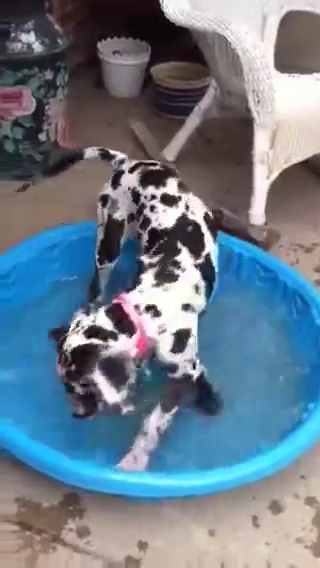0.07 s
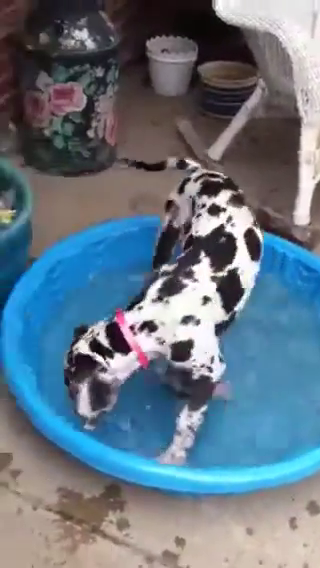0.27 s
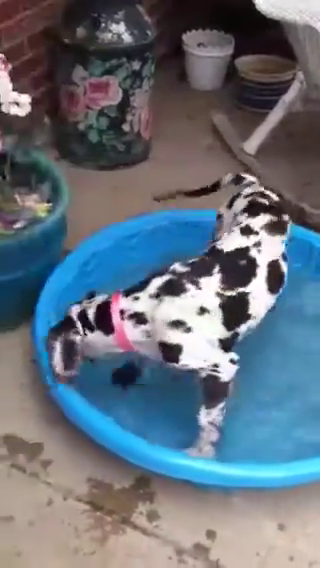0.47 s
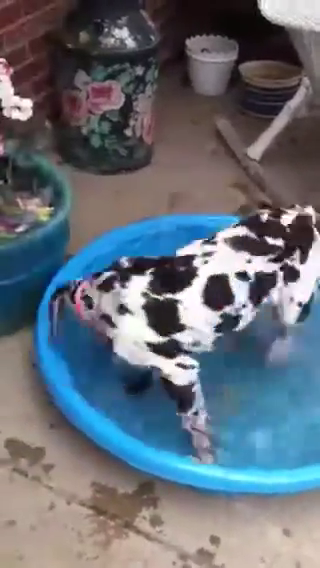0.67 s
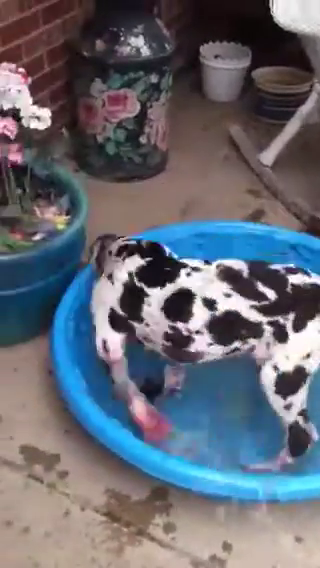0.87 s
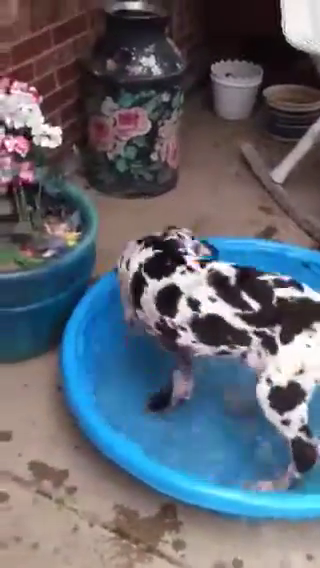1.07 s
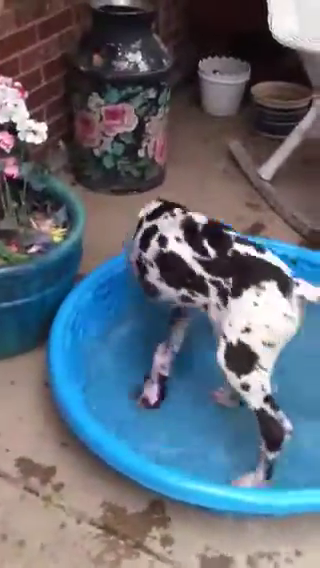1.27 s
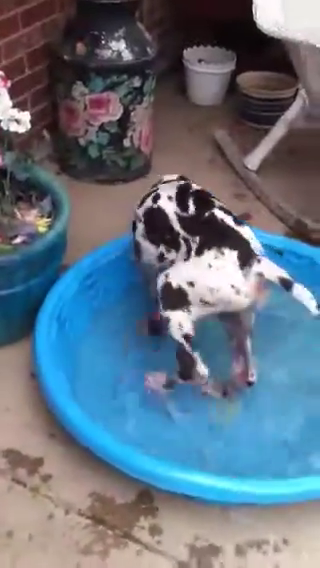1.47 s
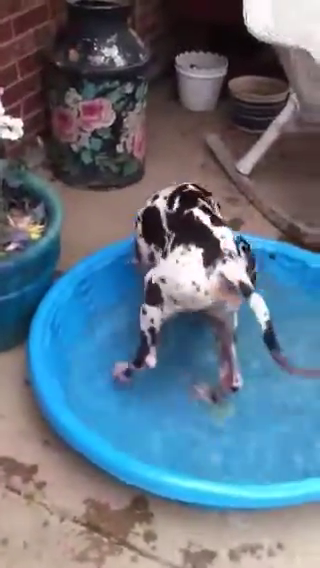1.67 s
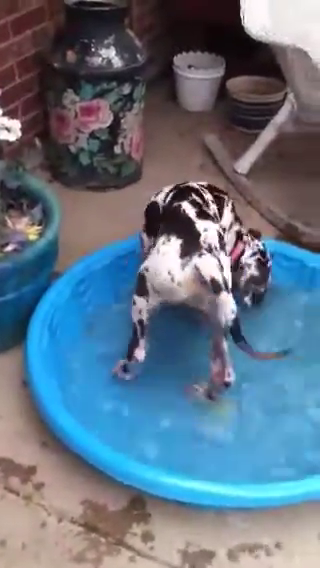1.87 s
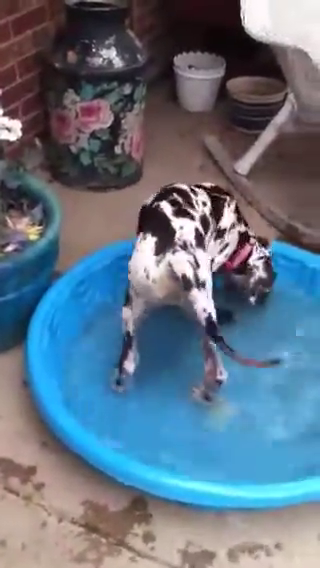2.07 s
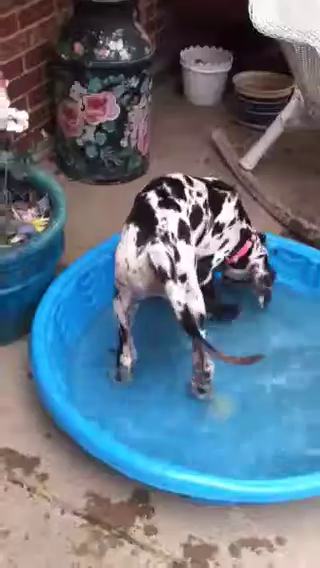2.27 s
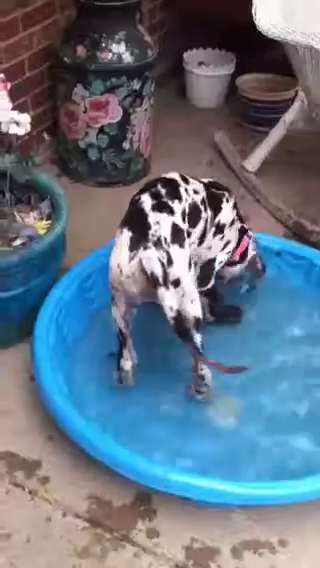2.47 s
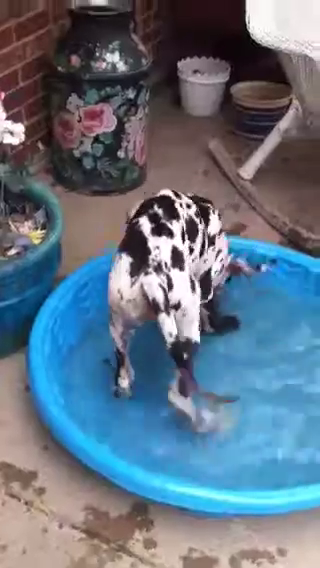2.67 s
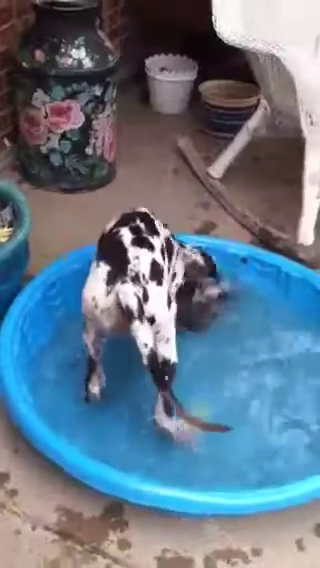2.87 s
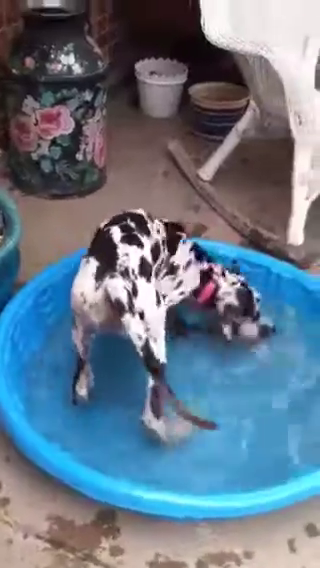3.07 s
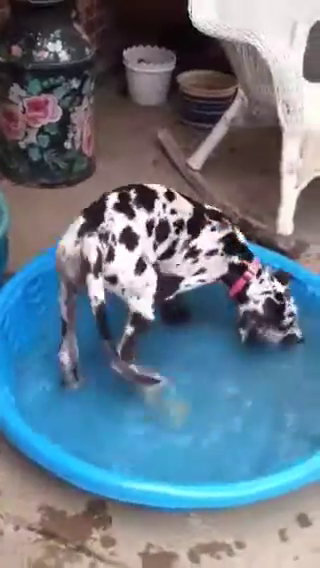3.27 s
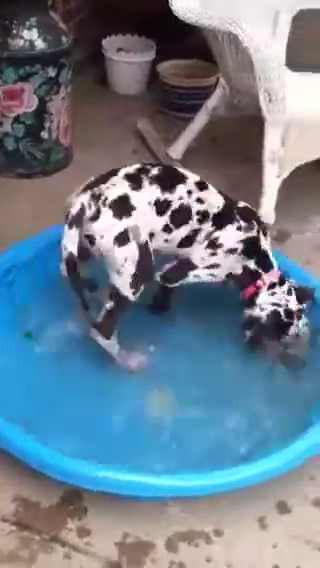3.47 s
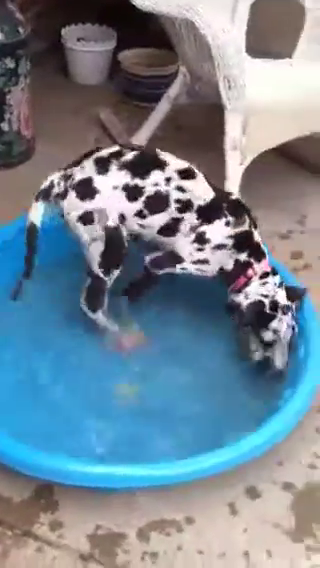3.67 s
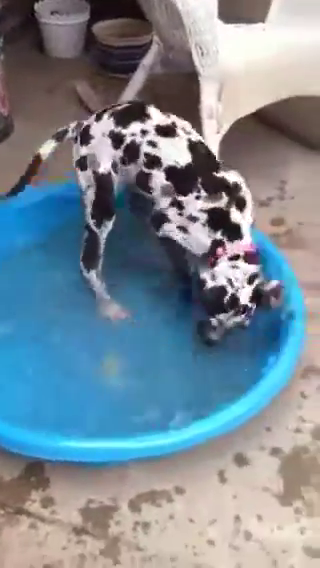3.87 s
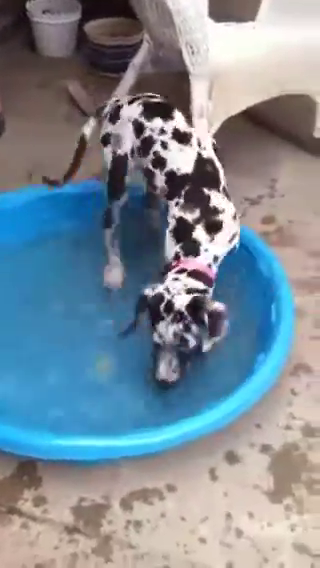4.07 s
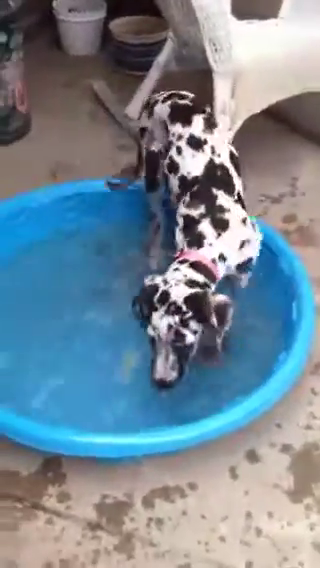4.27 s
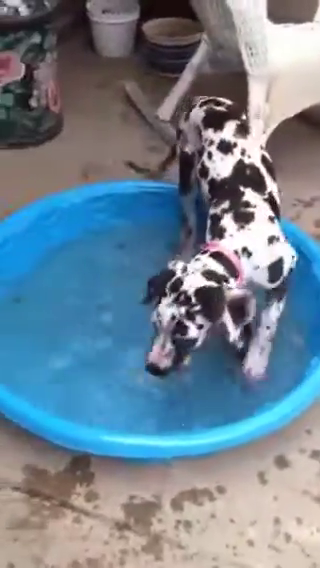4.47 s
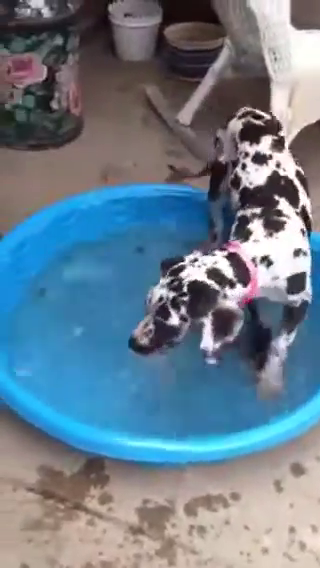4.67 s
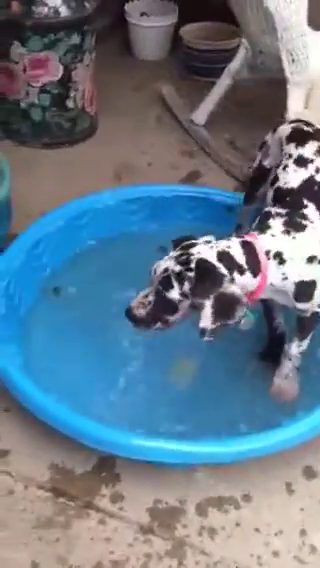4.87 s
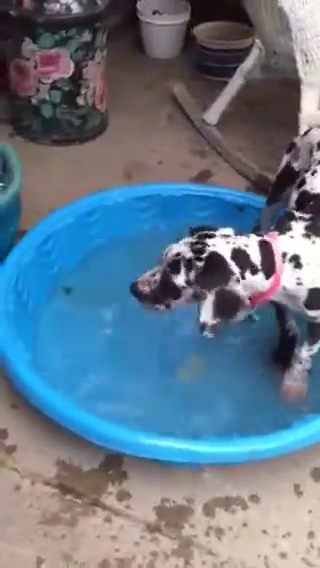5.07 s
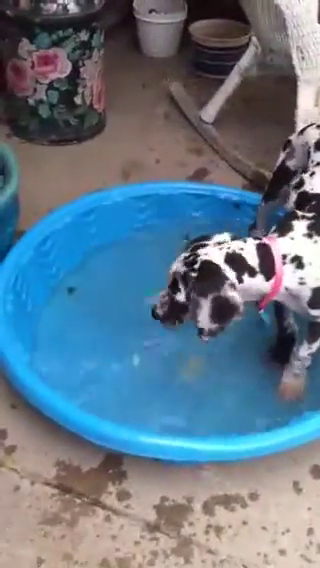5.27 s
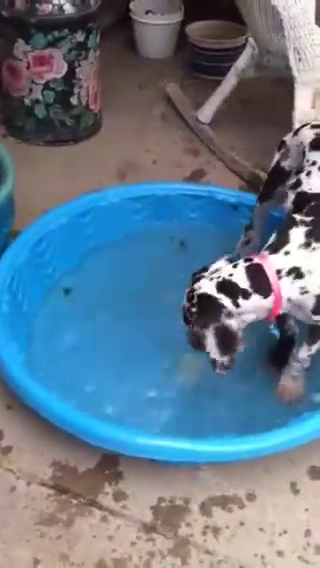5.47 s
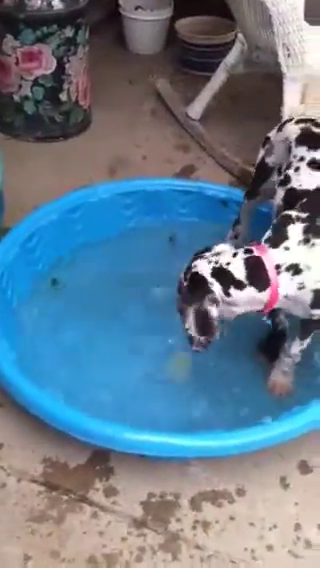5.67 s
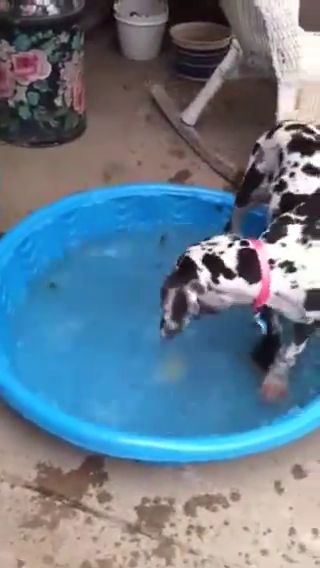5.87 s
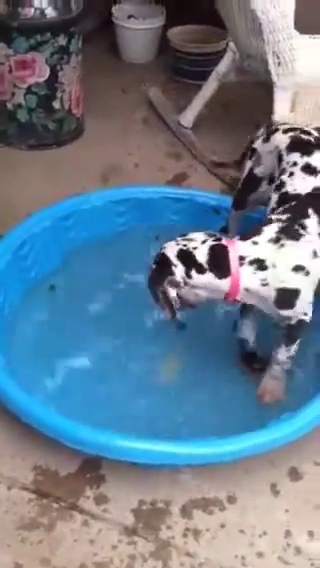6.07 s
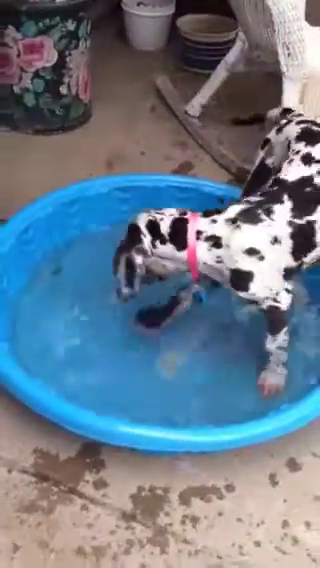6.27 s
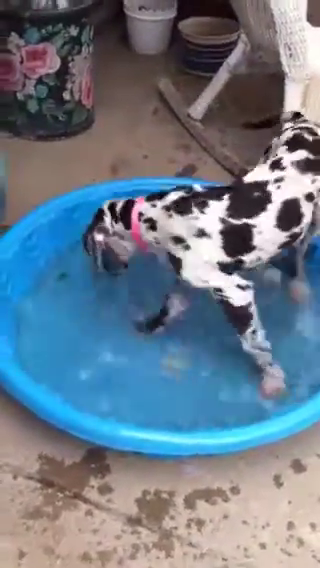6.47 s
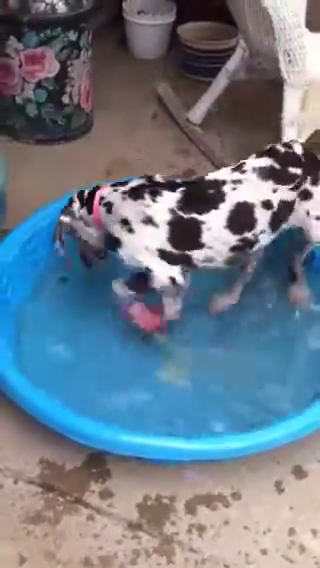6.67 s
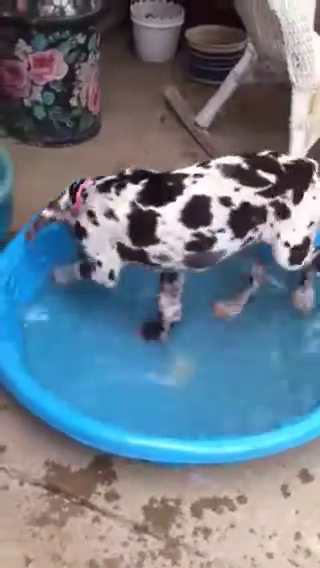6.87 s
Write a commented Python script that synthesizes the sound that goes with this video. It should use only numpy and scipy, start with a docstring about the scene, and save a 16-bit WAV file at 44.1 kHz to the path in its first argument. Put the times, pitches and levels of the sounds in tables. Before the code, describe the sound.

Close, natural outdoor water sounds: paws plunge and skim through shallow water, making low gulps, ringing mid-pitched bubbles, bright droplets and wet slaps. Uneven early splashing leads to lighter plopping, then a dense churning burst halfway through. The water calms almost completely before a brief last flurry with a loud crisp smack. Short patio echoes surround it over a very faint hum.

```python
"""A puppy wades, paws and noses about in a shallow plastic pool on a patio, for about seven seconds.
It opens with quick splashes over stirred water: plunging and spraying noise, bubbles that ring, slaps that crack.
The strokes are heaviest from about 3.4 to 4.3 s, then the water calms to laps and stray trickling bubbles.
Near 6.5 s a last flurry brings the sharpest slap. Throughout, decaying noise and echoes answer from pool and
house wall, and shaped steady noise makes a faint outdoor hum."""
import sys
import numpy as np
from scipy import signal
from scipy.fft import rfft, irfft, next_fast_len
from scipy.io import wavfile
from scipy.ndimage import uniform_filter1d

SR = 44100
rng = np.random.default_rng(int(sys.argv[2]) if len(sys.argv) > 2 else 0)


def waveform_to_disk(signal):
    """Save audio, clipped to [-1, 1], as 16-bit WAV at the path in sys.argv[1]."""
    frames = np.transpose(np.atleast_2d(signal))
    scaled = np.clip(frames, -1, 1) * 32767
    samples = np.round(scaled).astype(np.int16)
    wavfile.write(sys.argv[1], SR, samples)


N = 305613  # length in samples

# Stirred water between strokes, before the settling gains.
# Each row: time in seconds, then bass, middle, treble and top level in dB.
STIRRED_WATER = [(0.0, -54.5, -55, -46.5, -47), (0.33, -59, -57, -72, -77), (0.44, -67, -58, -60.5, -62),
                 (0.52, -59, -52.5, -62, -63), (0.87, -61, -54, -46, -52), (1.08, -51, -54.5, -52.5, -53.5),
                 (1.29, -50, -54, -58.5, -61.5), (1.51, -62, -54, -56, -59.5),
                 (1.77, -54, -50.5, -57, -56.5), (1.91, -55.5, -50.5, -55.5, -56),
                 (2.08, -59, -61.5, -64, -65.5), (2.33, -59, -55.5, -66, -66),
                 (2.52, -64.5, -57.5, -66, -67), (2.659, -55.5, -53, -61, -61.5),
                 (2.82, -58.5, -48.5, -58, -63), (3.36, -61, -47, -53.5, -53.5),
                 (3.53, -56, -43, -52, -52.5), (4.01, -52, -47, -48.5, -52), (4.25, -51.5, -52, -55, -51.5),
                 (4.48, -61.5, -53.5, -52, -56), (4.9, -63, -58, -57, -61), (5.19, -64.5, -62, -67, -65),
                 (6.14, -66.5, -62.5, -68, -68), (6.44, -66, -60, -65, -60), (6.58, -64.5, -64, -58, -64),
                 (6.93, -64.5, -60.5, -63, -60)]
# Paw and muzzle strokes. Each row: start in seconds, swell in seconds, strength in dB before it is shared out,
# depth in dB (plus plunges, minus skims), extra mist in dB, fall by 60 dB in seconds.
STROKES = [(.008, 0.0036, -51.5, 14, 8, 0.36), (0.054, 0.024, -38.5, 0.5, 1.5, 0.13),
           (0.183, 0.0024, -53.5, -0.5, 1.5, 0.71), (0.313, 0.0092, -46.5, 1, -8, 0.28),
           (.47, 0.028, -60, -13, -3, .41), (.555, 0.053, -53, 8.5, 4, 0.24),
           (0.668, 0.012, -43, -3.5, 0.5, 0.17), (0.858, 0.033, -42.5, 11.5, 11, 0.33),
           (.998, 0.0075, -44.5, -4, -3, 0.18), (1.135, 0.0082, -56.5, -9, 0.5, 0.36),
           (1.235, 0.0065, -47, -4, 3, 0.15), (1.273, 0.0053, -42, 1, -6, .16),
           (1.387, 0.0054, -39, -0.5, -1.5, 0.18), (1.612, .004, -61, -16, 1, .088),
           (1.679, 0.0049, -56.5, -14.5, -3.5, 0.27), (1.782, .019, -51, -8, 4, 0.067),
           (1.868, 0.0028, -44.5, 9.5, -2, 0.099), (1.921, 0.0066, -45.5, 10, -4, 0.067),
           (2.048, 0.0047, -49.5, 2, 7.5, 0.1), (2.404, 0.014, -52.5, 8.5, -2, 0.15),
           (2.599, 0.0073, -48, 11, -8, 0.14), (2.694, 0.0033, -47.5, 3, -11, 0.15),
           (2.835, 0.0073, -50, 12, 3, 0.17), (2.89, 0.012, -44.5, 3, 2.5, 0.3),
           (3.014, 0.0046, -44.5, 4.5, -18, 0.067), (3.105, 0.0082, -42.5, 3.5, 3, 0.076),
           (3.134, 0.022, -45, 4, -13, .1), (3.254, 0.0049, -44, -0.5, -5, 0.087),
           (3.389, 0.03, -43, 6, -15, 0.23), (3.432, 0.016, -39, -1, 4.5, 0.23),
           (3.462, 0.021, -31.5, 1.5, -5.5, .14), (3.48, 0.0095, -36, 10.5, -3, 0.32),
           (3.525, 0.01, -36.5, -1.5, -17, 0.052), (3.75, 0.01, -56.5, 17.5, 0, 0.43),
           (3.832, 0.01, -42.5, -1, -1.5, 0.34), (3.997, 0.02, -39, -3, -1, 0.2),
           (4.066, 0.011, -55.5, -17.5, -3, 0.31), (4.204, 0.015, -38, -0.5, 3.5, 0.094),
           (4.328, 0.0072, -46.5, 1.5, -2, 0.16), (4.388, 0.0057, -43.5, 3.5, -1, 0.08),
           (4.7, 0.0046, -66, 16.5, 0, 0.27), (4.865, 0.028, -48, 6, -3, 0.3),
           (5.1, 0.018, -53.5, 7.5, 7.5, 0.085), (5.471, 0.0051, -64.5, -10, -3, 0.18),
           (5.555, 0.034, -62.5, 2, 3, 0.87), (6.223, 0.003, -55, 6.5, 0, 0.17),
           (6.388, 0.0075, -48.5, -4, 0, 0.24), (6.439, 0.012, -50, 4.5, -17, 0.33),
           (6.526, 0.005, -48.5, -10.5, 2, 0.2), (6.542, 0.0028, -53.5, 4.5, -2, 0.37),
           (6.667, 0.029, -54.5, -2.5, -6, 0.7), (6.794, 0.0035, -54.5, -2.5, 6, 0.057)]
# Single bubbles, drips and a close echo.
# Each row: start in seconds, pitch in Hz, peak in dB, time to the peak in seconds.
SINGLE_BUBBLES = [(.009, 276, -38, 0.0043), (0.087, 318, -31, 0.0035), (0.0867, 1500, -36.5, 0.0033),
                  (0.261, 1180, -46.5, 0.005), (.349, 374, -43.5, 0.0051), (0.8869, 242, -37, 0.0044),
                  (0.898, 1580, -34, 0.0016), (1.276, 2010, -30.5, 0.001), (1.2764, 489, -32.5, 0.0074),
                  (1.2766, 764, -27.5, 0.00095), (1.2793, 1355, -36, 0.0053), (1.37, 480, -37, 0.0025),
                  (1.437, 360, -39, 0.0027), (1.5147, 1990, -40, .0024), (1.6104, 782, -32, 0.0041),
                  (1.6148, 2500, -35.5, 0.0017), (1.7198, 2360, -39.5, 0.0036), (1.926, 700, -40, 0.00098),
                  (2.0392, 1300, -34.5, 0.0015), (2.088, 934, -31.5, 0.0013), (2.2872, 920, -34, 0.002),
                  (2.358, 1050, -43, 0.0047), (2.4036, 272, -37.5, 0.0083), (2.4166, 693, -38, 0.0065),
                  (2.428, 1040, -33.5, 0.0014), (2.5741, 1030, -33, 0.00051), (2.6013, 800, -34, 0.0045),
                  (2.739, 2120, -37, 0.00062), (2.7606, 860, -36.5, .0022), (2.7884, 1270, -32, 0.0025),
                  (2.843, 533, -30.5, 0.002), (2.9058, 1060, -33.5, 0.00092), (2.9214, 1280, -37, .0022),
                  (2.943, 334, -39.5, 0.0034), (2.956, 725, -39, 0.0037), (2.978, 600, -34, 0.0014),
                  (3.1117, 303, -31.5, 0.0054), (3.154, 1005, -34, 0.0043), (3.264, 1164, -35.5, 0.0021),
                  (3.3367, 746, -27, 0.0047), (3.3676, 720, -28.5, 0.0016), (3.41, 775, -31, 0.0052),
                  (3.4628, 1300, -32, 0.0022), (3.504, 371, -29.5, 0.0059), (3.5084, 804, -26, 0.0042),
                  (3.5333, 1390, -25, 0.0014), (3.603, 880, -25.5, 0.0022), (3.6677, 773, -28.5, 0.0035),
                  (3.7131, 1100, -33.5, 0.0022), (3.846, 1250, -31.5, 0.0014), (3.8666, 1180, -27, 0.0034),
                  (3.9862, 880, -28.5, 0.0017), (3.988, 534, -36, 0.0022), (4.013, 1220, -28.5, 0.0017),
                  (4.0218, 380, -36.5, 0.0074), (4.1108, 1240, -33.5, 0.0024), (4.189, 930, -37, 0.0026),
                  (4.2081, 760, -25, 0.0012), (4.228, 718, -33.5, 0.0053), (4.24, 1140, -29, 0.001),
                  (4.3466, 1060, -35, 0.0013), (4.752, 2190, -48, 0.0051), (4.8256, 1950, -46, 0.0029),
                  (4.882, 1130, -33, 0.002), (4.9043, 2090, -33.5, 0.0019), (4.9665, 1490, -37.5, 0.0023),
                  (5.0425, 2190, -47, 0.0052), (5.0848, 1940, -49, 0.0029), (6.1073, 1550, -48, 0.0011),
                  (6.2306, 6700, -44.5, 0.0005), (6.2825, 5170, -51, .0008), (6.533, 1540, -28, 0.00035),
                  (6.6054, 1140, -30, 0.0047), (6.623, 1155, -38.5, 0.0034), (6.67, 1510, -42, 0.0024),
                  (6.6757, 2050, -43, 0.002), (6.7014, 1156, -40.5, 0.003), (6.8502, 837, -46, 0.0085)]
# Sharp slaps and drops on the surface.
# Each row: start in seconds, pitch in Hz, level in dB before a 1 dB trim, ring length in cycles (peak halfway).
SURFACE_SLAPS = [(0.068, 3270, -30, 1.4), (.188, 3150, -32, 3.5), (0.3224, 2790, -30.5, 3.6),
                 (0.325, 1570, -34.5, 2.4), (0.336, 3800, -45, 7.6), (0.479, 4830, -39, 3),
                 (.862, 2600, -34, 2.7), (1.075, 2430, -38, 3), (1.371, 5060, -34, 3),
                 (1.534, 3930, -39, 2), (1.87, 3300, -35, 0.87), (2.709, 1900, -44, 2),
                 (2.985, 2150, -37, 3), (3.151, 2190, -32, 2.7), (3.2558, 4470, -41, 3.8),
                 (3.542, 2980, -30, 2.2), (3.653, 2370, -36.5, 3.4), (3.717, 2040, -27, 0.73),
                 (3.788, 2370, -38, 3.7), (3.846, 2060, -36, 1), (4.0031, 2080, -27.5, 3.8),
                 (4.005, 5100, -27.5, 4.2), (4.053, 3600, -34, 1.9), (4.2193, 2270, -35, 1.2),
                 (4.392, 1930, -35.5, 3), (4.482, 2250, -40, 1.8), (4.506, 2800, -29.5, 0.72),
                 (4.589, 2320, -32, 2.5), (4.649, 1200, -39, 1.6), (4.722, 2620, -37.5, 4.7),
                 (4.967, 3840, -35, 1), (5.028, 2450, -36.5, 1), (5.742, 2000, -45.5, 1.5),
                 (5.763, 2600, -46.5, 1.9), (6.083, 4210, -52.5, 3.2), (6.172, 1550, -50, 3.4),
                 (6.228, 1640, -47, 4.6), (6.266, 3070, -48.5, 3.2), (6.3506, 2940, -54, 4),
                 (6.3743, 2720, -50, 3.7), (6.3964, 3290, -30, 4.2), (6.5294, 2260, -34, 1.4),
                 (6.5438, 2840, -15.5, 2.4), (6.796, 1790, -33.5, 2.5), (6.888, 3200, -46, 3.3)]
# Colour of big air pockets plunging. Each row: frequency in Hz, relative level in dB per Hz.
PLUNGE_COLOUR = [(60, -41), (100, -42), (150, -6.5), (215, 1.5), (290, -1), (380, -0.5), (520, -3.5),
                 (700, -10), (1400, -62)]
# Colour of middling bubbles gurgling. Each row: frequency in Hz, relative level in dB per Hz.
GURGLE_COLOUR = [(250, -3), (450, -5.5), (750, 5.5), (1250, 4.5), (1800, -3), (2400, -4.5), (3600, -18),
                 (7000, -59)]
# Colour of spray, mist and droplets. Each row: frequency in Hz, relative level in dB per Hz.
SPRAY_COLOUR = [(1000, -12), (1800, 0.5), (2500, -2), (3500, -1.5), (5300, -6), (8000, -9.5), (12000, -13),
                (16000, -16.5)]
# Colour of the outdoor hum. Each row: frequency in Hz, relative level in dB per Hz.
OUTDOOR_COLOUR = [(25, -13), (55, -19), (85, -3.5), (150, 0), (260, -1.5), (400, -8.5), (550, -5),
                  (900, -4.5), (1300, -16), (2000, -18.5), (5000, -19.5), (9000, -29), (15800, -24)]
# Ring of the patio. Each row: frequency in Hz, fall by 60 dB in seconds.
PATIO_RING = [(200, 0.32), (2000, 0.2), (12000, 0.13)]
# Echoes from the pool side and the house wall. Each row: delay in seconds before stretching, level in dB.
WALL_ECHOES = [(.006, -24.5), (0.013, -15.5), (.021, -19.5)]
# How plunge, gurgle, spray and mist follow the stirred water.
# Each row: gain in dB, water level in dB (before gain) under which the part falls still.
SETTLING_PARTS = [(0.5, -65.5), (-3.5, -58), (-3, -66), (-2.5, -68.5)]
# How a stroke is shared between plunge, gurgle, spray and mist.
# Each row: share in dB, dB gained per dB of depth.
STROKE_SHARES = [(-5, 1), (-1.5, 0), (-3.5, -1), (-4, -1)]
# Tone of the microphone. Each row: frequency in Hz, gain in dB.
MICROPHONE = [(25, -4.0), (55, -10.5), (85, -4.5), (130, -0.5)]

TOP_HZ = 15900  # nothing is kept from here up
MIST_HZ = 5340  # spray above this is mist
SPIT_T60_S = 0.005  # a droplet landing
TRICKLE_CEILING_DB, TRICKLE_LIFT_DB = -40.5, 8  # limit on the stirring that drives stray bubbles, then their gain
TICK_DB, TICK_T60_S = -10.5, 0.0035  # first contact of a slap, level relative to the slap
CRACK_Q, CRACK_DB, CRACK_T60_S = 0.88, -9, 0.021  # sharpness around the pitch, relative level, decay
SCATTER_DB, SCATTER_DELAY_S, SCATTER_T60_S = -18, 0.0022, 0.034  # off the pool side and the puppy's legs
CLIMB_PER_S = 51  # a longer-lived bubble rises further: pitch climb as a share, per s of life
# Lesser bubbles after a single one: time they spread over, level under it, range of pitch, life.
BREAKUP_S, BREAKUP_DB, BREAKUP_OCTAVES, BREAKUP_CYCLES = 0.03, -13, 1.3, 1.8


def water():
    """Big air pockets thud, middling ones gurgle, spray fizzes, droplets patter and the finest mist hisses."""
    deep, middle, fine, finest = agitation()
    plunge = swarm(PLUNGE_COLOUR, low_hz=188.7, high_hz=548.0, rate=260, cycles=1.32, climb=0.4,
                   spread_db=1.5, churn_db=-1.5, rough_db=2.0)
    gurgle = swarm(GURGLE_COLOUR, low_hz=524.0, high_hz=3160, rate=540, cycles=2.6, climb=0.26,
                   spread_db=5.5, churn_db=-12.5, rough_db=-0.5)
    spray = swarm(SPRAY_COLOUR, low_hz=1923, high_hz=6630, rate=620, cycles=6.9, climb=0.13,
                  spread_db=13.0, churn_db=1.0, rough_db=2.5)
    # spray and mist split the treble at one crossover
    spray = filtered(spray, lambda hz: 1 / np.sqrt(1 + (hz / MIST_HZ) ** 8))
    mist = coloured(rng.standard_normal(N), SPRAY_COLOUR) + amp(-4.5) * patter(rate=110, spread_db=17)
    mist = filtered(mist, lambda hz: np.sqrt(1 - 1 / (1 + (hz / MIST_HZ) ** 8)))
    ceiling = amp(TRICKLE_CEILING_DB)
    stirring = ceiling * np.tanh(np.sqrt(middle * fine) / ceiling)
    trickle = strays(stirring, rate=120, centre_hz=2207, octaves=1.55, cycles=3.53, spread_db=9.5)
    body = deep * plunge + middle * gurgle + fine * spray + finest * mist
    return body + amp(TRICKLE_LIFT_DB) * trickle


def agitation():
    """Strength of plunge, gurgle, spray and mist: the stirred pool plus strokes that swell and die."""
    now, t = np.arange(N) / SR, np.arange(SR // 2) / SR
    times, *levels = np.transpose(STIRRED_WATER)
    power = np.zeros((len(levels), N))
    for part, level, (gain_db, still_db) in zip(power, levels, SETTLING_PARTS):
        stir_db = np.interp(now, times, level)
        stillness = 1 + amp(still_db - stir_db) ** 4
        part += amp(stir_db + gain_db) ** 2 / stillness
    # gurgle and spray each come in uneven bursts as wavelets break
    for part in power[1:3]:
        part *= wavelets(rate=45, t60=0.14, share=0.44)
    for s, swell, db, depth_db, mist_db, t60 in STROKES:
        stroke = np.minimum(t / swell, 1) * amp(-60 * np.maximum(t - swell, 0) / t60)
        for part, (share_db, lean), extra_db in zip(power, STROKE_SHARES, (0, 0, 0, mist_db)):
            part_db = db + share_db + lean * depth_db + extra_db
            add(part, s, (amp(part_db) * stroke) ** 2)
    return np.sqrt(power)


def wavelets(rate, t60, share):
    """Power of mean 1, a share of it in bursts that start at once and die quickly."""
    slot, size = rng.random((int(rate * N / SR), 2)).T
    # one burst at a random place in each equal slot of time
    when = (np.arange(len(slot)) + slot) * N / len(slot)
    starts = np.bincount(when.astype(int), size ** 2, N)
    decay = amp(-60 * np.arange(SR // 8) / SR / t60) ** 2
    bursts = np.abs(signal.fftconvolve(starts, decay)[:N])
    return 1 + np.clip(share, 0, 1) * (bursts / bursts.mean() - 1)


def swarm(spectrum, low_hz, high_hz, rate, cycles, climb, spread_db, churn_db, rough_db):
    """A steady crowd of small bubbles on churning noise, at rms 1."""
    when, tone, size, damping, depth = rng.random((int(rate * N / SR), 5)).T[..., None]
    hz = low_hz * (high_hz / low_hz) ** tone
    life = cycles * 2 ** (1 - 2 * damping) / hz
    steps = np.arange(int(2.5 * SR * np.max(life)))
    # most bubbles are faint, a few stand out
    loudness = amp(spread_db * size ** 3) * np.sqrt(hz / life)
    rings = loudness * bubble(steps / SR, hz, life, climb * depth)
    places = (when * N).astype(int) + steps
    crowd = np.bincount(places.ravel(), rings.ravel())[:N]
    # the breaking surface rushes in tiny uneven spurts
    unevenness = unit(uniform_filter1d(rng.standard_normal(N), size=200))
    churn = coloured(amp(rough_db * unevenness) * rng.standard_normal(N), spectrum)
    return unit(coloured(crowd, spectrum) + amp(churn_db) * churn)


def patter(rate, spread_db):
    """Flung droplets land as tiny bright spits, at rms 1."""
    when, size = rng.random((int(rate * N / SR), 2)).T
    landings = np.bincount((when * N).astype(int), amp(spread_db * size ** 2), N)
    decay = amp(-60 * np.arange(SR // 50) / SR / SPIT_T60_S)
    spits = signal.fftconvolve(landings, decay)[:N]
    return coloured(spits * rng.standard_normal(N), SPRAY_COLOUR)


def strays(strength, rate, centre_hz, octaves, cycles, spread_db):
    """Stray bubbles of random size ring at random, following how hard the water is stirred at that moment."""
    out, t = np.zeros(N), np.arange(SR // 12) / SR
    for when, size, damping, *tone in rng.random((int(rate * N / SR), 5)):
        hz = centre_hz * 2 ** (octaves * (sum(tone) - 1))  # two draws crowd the pitches at the centre
        life = cycles * 2 ** (1 - 2 * damping) / hz
        peak = strength[int(when * N)] * amp(-spread_db * size)
        add(out, when * N / SR, peak * bubble(t, hz, life, CLIMB_PER_S * life))
    return out


def plops():
    """Bubbles and drips that stand out, each followed by brief lesser ones as the cavity breaks up."""
    out, t = np.zeros(N), np.arange(SR // 12) / SR
    for s, hz, db, life in SINGLE_BUBBLES:
        add(out, s, amp(db) * bubble(t, hz, life, CLIMB_PER_S * life))
        for lag, tone in rng.random(size=(4, 2)):
            small_hz = hz * 2 ** (BREAKUP_OCTAVES * (tone - 1 / 4))  # mostly higher than the first
            small_life = BREAKUP_CYCLES / small_hz
            small = bubble(t, small_hz, small_life, CLIMB_PER_S * small_life)
            add(out, s + BREAKUP_S * lag, amp(db + BREAKUP_DB) * (1 - lag / 2) * small)
    return out


def slaps():
    """Water struck flat by a paw or a drop: a bright tick, a short ring and a wet crack around its pitch."""
    out, t = np.zeros(N), np.arange(SR // 25) / SR
    for s, hz, db, cycles in SURFACE_SLAPS:
        ring = bubble(t, hz, life=cycles / hz / 2, climb=0.03)
        around = signal.iirpeak(hz, CRACK_Q, SR)
        hiss = signal.lfilter(*around, rng.standard_normal(len(t)))
        hiss = unit(signal.lfilter(*around, hiss))  # a second pass narrows the band
        rise = np.minimum(t * hz / 2, 1)  # over two cycles
        crack = rise * amp(CRACK_DB - 60 * t / CRACK_T60_S) * hiss
        tick = amp(TICK_DB - 60 * t / TICK_T60_S) * rng.standard_normal(len(t))
        add(out, s, amp(db - 1.0) * (tick + ring + crack))
    return out


def bubble(t, hz, life, climb):
    """Trapped air swells to peak 1 at t = life and dies; its pitch climbs as it nears the surface."""
    age = t / life
    shape = age * np.exp((1 - age * np.sqrt(age)) * 2 / 3)
    pitch = hz * (1 + climb * (np.tanh(age / 3) - 0.4))  # starts below hz, ends above
    return shape * np.sin(2 * np.pi * np.cumsum(pitch, axis=-1) / SR)


def patio(x, tail_db, roam):
    """As the puppy moves about, the echo paths change length every fifth of a second."""
    out, step = np.zeros(N), SR // 5
    for start in range(0, N, step):
        response = answer(tail_db, stretch=1 + roam * rng.uniform(-1, 1))
        add(out, start / SR, signal.fftconvolve(x[start:start + step], response))
    return out


def answer(tail_db, stretch):
    """The response from one spot: quick scatter inside the pool, a few clear echoes and a short diffuse tail."""
    hz, t, z = signal.stft(rng.standard_normal(SR // 3), SR, nperseg=256)
    decay = amp(-60 * t / along(PATIO_RING, hz)[:, None])  # each frequency dies at its own pace
    tail = signal.istft(z * decay, SR, nperseg=256)[1]
    response = np.pad(amp(tail_db) * tail / np.linalg.norm(tail), (SR // 200, 0))
    fade = amp(-60 * np.arange(SR // 20) / SR / SCATTER_T60_S)
    scatter = rng.standard_normal(SR // 20) * fade
    add(response, SCATTER_DELAY_S, amp(SCATTER_DB) * scatter / np.linalg.norm(scatter))
    for delay, db in WALL_ECHOES:
        add(response, delay * stretch, amp(db) * np.array([0.25, 0.5, 0.25]))  # slightly dulled
    return response


def outdoor_hum():
    """Steady noise, strongest in the low range, stands for the faint outdoors."""
    return amp(-63.0) * coloured(rng.standard_normal(N), OUTDOOR_COLOUR)


def amp(db):
    """Decibels to gain."""
    return 10 ** (np.asarray(db) / 20)


def unit(x):
    """Scale to rms 1."""
    return x / np.sqrt(np.mean(x ** 2) + 1e-20)


def along(points, hz):
    """(Hz, value) points read on a log frequency axis."""
    f, v = np.transpose(points)
    return np.interp(np.log(hz + 1), np.log(f + 1), v)


def filtered(x, response):
    """Multiply the spectrum of x by a response of frequency."""
    size = next_fast_len(N + SR // 2)
    return irfft(rfft(x, size) * response(np.fft.rfftfreq(size, 1 / SR)), size)[:N]


def coloured(x, spectrum):
    """Filter x by a colour table, at rms 1."""
    return unit(filtered(x, lambda hz: amp(along(spectrum, hz))))


def add(track, s, sound):
    """Mix a sound into the track at time s."""
    part = track[max(round(s * SR), 0):][:len(sound)]
    part += sound[:len(part)]


def scene():
    """The pool, its surroundings and the outdoor hum."""
    pool = water() + plops() + slaps()
    return (pool + patio(pool, tail_db=-9.0, roam=0.2) + outdoor_hum())[None]


def record(dry):
    """The microphone thins out the deep bass and keeps nothing above its band limit."""
    return filtered(dry[0], lambda hz: amp(along(MICROPHONE, hz)) * (hz < TOP_HZ))[None]


dry = scene()
out = record(dry)
waveform_to_disk(out)
```